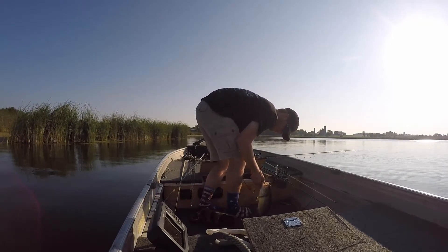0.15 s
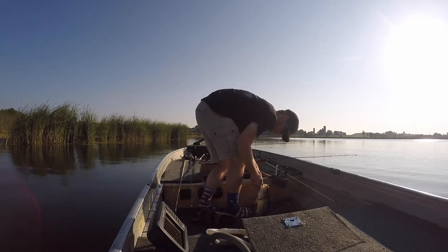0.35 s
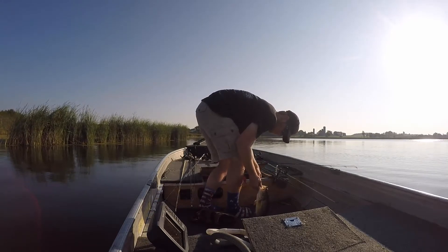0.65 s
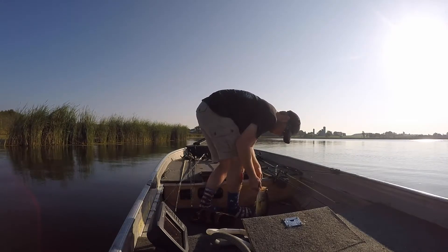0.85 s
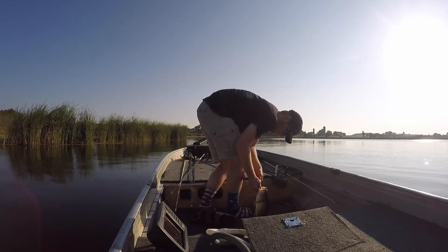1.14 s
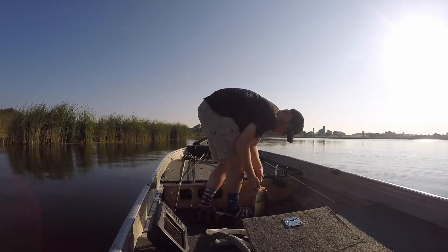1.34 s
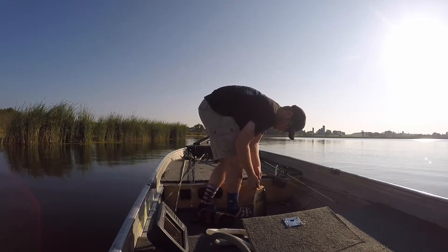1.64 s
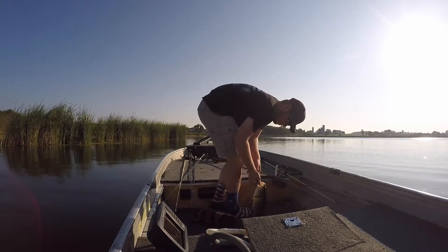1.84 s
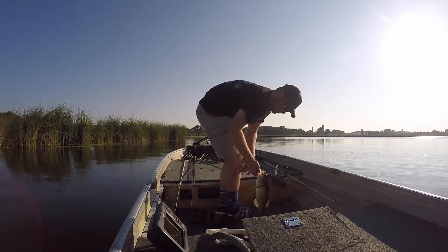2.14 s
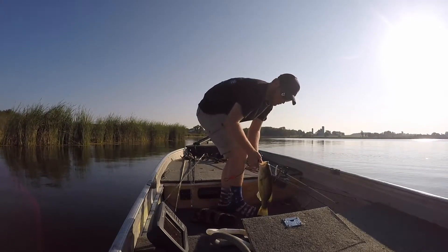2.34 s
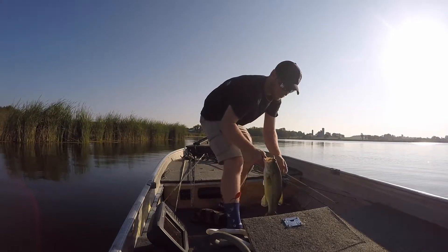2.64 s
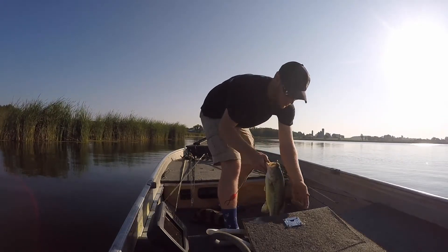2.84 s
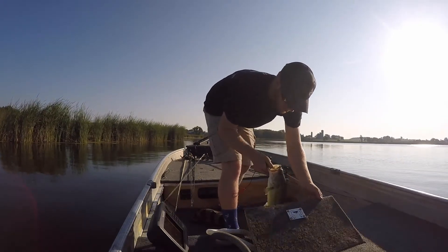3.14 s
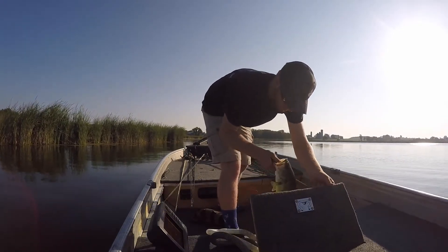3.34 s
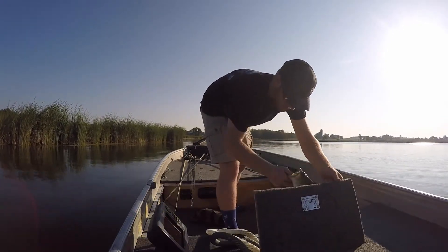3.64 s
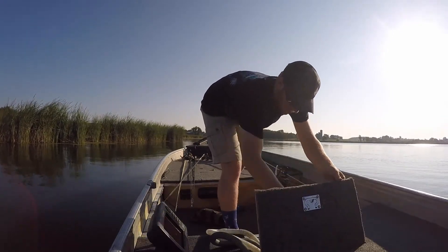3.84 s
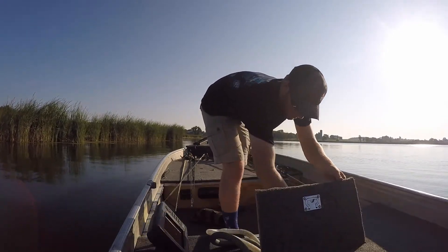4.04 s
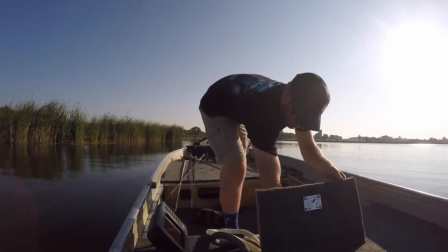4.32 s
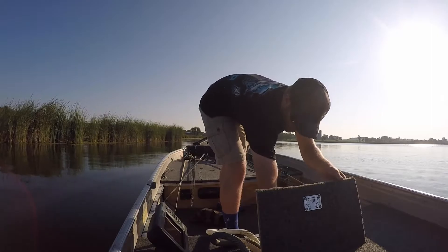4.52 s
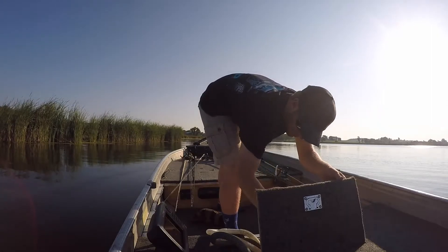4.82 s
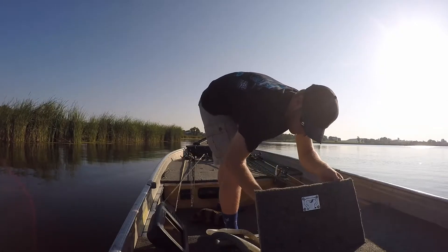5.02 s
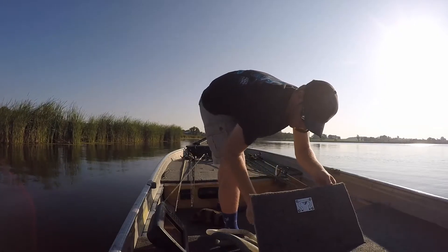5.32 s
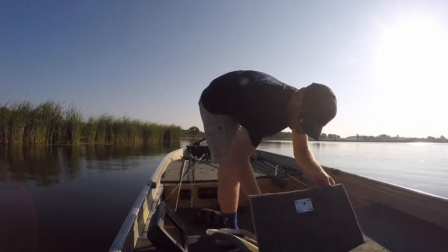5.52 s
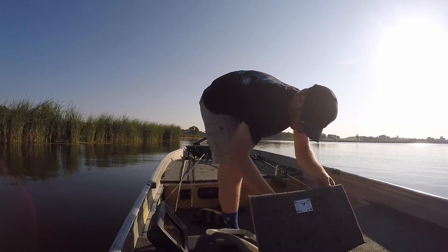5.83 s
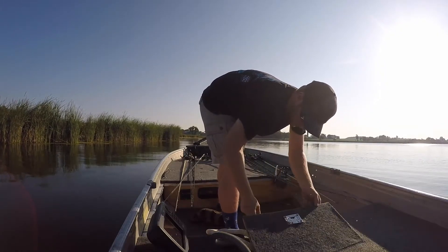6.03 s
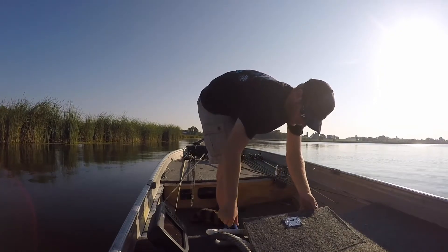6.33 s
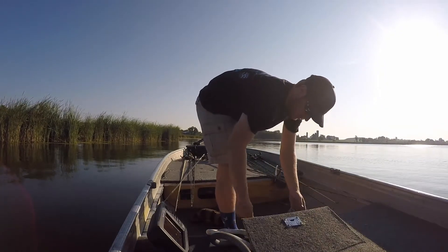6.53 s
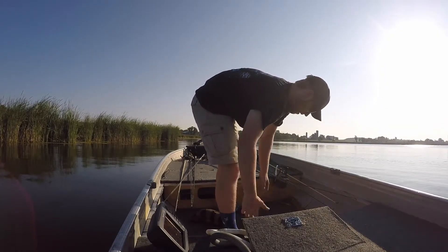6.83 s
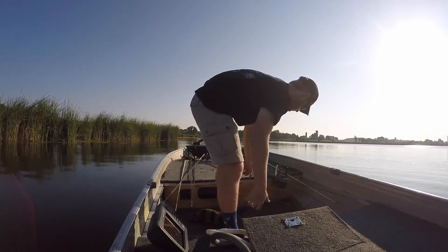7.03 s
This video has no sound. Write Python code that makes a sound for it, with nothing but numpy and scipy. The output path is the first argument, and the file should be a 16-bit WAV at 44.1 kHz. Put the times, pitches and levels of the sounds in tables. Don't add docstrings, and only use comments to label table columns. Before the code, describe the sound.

The microphone is fixed to a metal boat on calm water, so blows arrive through the hull, deep and close. Low rumble lurches unevenly with shifting feet, strongest in the first 1.7 s; faint hiss and distant traffic lie behind. A soft thud opens, then at 1.0 s tackle lands with a very loud, bright crack and a boom near 80 Hz, rattling until 1.4 s. Around 2 s it is quiet, with sparse ticks, drips and a faint insect chirp at 2.2. At 3.0 s the hatch gives duller knocks and scraping, with a thump at 3.3. From 3.9 to 5.5 s, hollow plops, drips and light rustle. A hollow plunk at 5.7 leads to two rising glugs, then scraping and a loud lid slam at 6.1 s. Bounces, scrapes, small clicks and thuds settle until just after 7 s.

```python
import sys
import numpy as np
from scipy import signal
from scipy.fft import rfft, irfft, next_fast_len
from scipy.io import wavfile
from scipy.ndimage import uniform_filter1d, map_coordinates

SR = 44100
rng = np.random.default_rng(int(sys.argv[2]) if len(sys.argv) > 2 else 0)


def unload_audio(sound):
    columns = np.transpose(np.atleast_2d(sound))
    steps = np.round(np.clip(columns, -1, 1) * 32767)
    wavfile.write(sys.argv[1], SR, steps.astype(np.int16))


def voltage_ratio(level):
    return 10 ** (np.asarray(level, float) / 20)


N = 316197

# [f/Hz, level/dB per Hz]
FAR_TRAFFIC_COLOUR = [(82, -33), (140, -2), (172, 0), (318, -8), (376, -3.5), (451, -12), (497, -9),
                      (632, -6), (688, -10.5), (876, -2.5), (964, -15), (1100, -13.5), (2500, -38.5),
                      (3250, -50), (5500, -120)]
HISS_COLOUR = [(1500, -22), (4000, 7), (8000, 0.5), (14700, -2.5), (15250, -5)]
ROCKING_COLOUR = [(7.1, -46.5), (12, -8.5), (32, -0.5), (49, -1.5), (62, -11), (120, -20.5), (160, -37.5),
                  (260, -120)]
HUM_COLOUR = [(40, -48), (62, -6), (80, 4.5), (100, -8), (125, -1.5), (170, -19), (260, -22)]
RUSTLE_COLOUR = [(710, -29.5), (1200, -2), (3000, -6), (3240, -5.5), (4000, -7), (5610, -12.5),
                 (12000, -25.5), (15250, -45)]
SCRAPE_COLOUR = [(130, -17), (220, 0), (600, -7), (1500, -12), (3500, -28.5), (7000, -40)]
CRACK_COLOUR = [(710, -25), (1200, -3), (1290, -20), (1430, -5.5), (1830, -6), (4260, -6.5), (4800, -9.5),
                (14700, -38.5), (16000, -42)]
BODY_COLOUR = [(150, -30), (300, 0), (800, 1.5), (1300, -5), (2200, -22)]
# [t/s, length/s, f/Hz, beats/Hz]
INSECT_CHIRP = (2.225, .065, 7950, 75)
# [t/s, level/dB]
SWAY = [(0.0, -33), (0.52, -42), (0.74, -40), (0.9, -33), (1.18, -33), (2.0, -53), (3.11, -38), (3.87, -43),
        (4.17, -52), (4.37, -52), (4.71, -42), (4.85, -46), (5.61, -42), (5.81, -45), (6.25, -37),
        (6.45, -40), (6.73, -38), (7.17, -44)]
# [middle t/s, peak level/dB, f/Hz, length/s]
LURCHES = [(0.146, -23.8, 47.7, 0.038), (0.21, -27.0, 40.1, 0.031), (0.352, -23.9, 42.9, 0.03),
           (0.451, -32.0, 49.1, 0.038), (0.512, -29.1, 39.7, 0.03), (0.678, -28.0, 36.7, 0.03),
           (0.753, -24.4, 46.5, 0.048), (0.851, -26.3, 42.4, 0.03), (0.93, -27.8, 31.6, 0.03),
           (1.128, -19.2, 37.4, 0.03), (1.213, -24.2, 46.6, 0.03), (1.332, -25.0, 45.6, 0.031),
           (1.479, -26.3, 37.7, 0.03), (1.56, -28.7, 46.0, 0.03), (1.677, -29.5, 42.4, 0.032),
           (1.902, -37.7, 26.4, 0.04), (2.351, -36.2, 28.7, 0.039), (2.499, -34.3, 38.2, 0.03),
           (2.592, -30.0, 42.1, 0.03), (2.659, -35.3, 36.6, 0.03), (2.967, -27.5, 31.5, 0.041),
           (3.035, -30.5, 54.7, 0.031), (3.11, -25.4, 38.1, 0.053), (3.308, -28.0, 36.5, 0.03),
           (3.377, -23.1, 45.5, 0.057), (3.45, -28.6, 43.5, 0.03), (3.639, -29.4, 31.4, 0.03),
           (3.736, -29.2, 30.7, 0.034), (3.908, -32.9, 32.4, 0.031), (3.994, -32.0, 29.4, 0.03),
           (4.55, -31.1, 23.9, 0.047), (4.681, -31.6, 34.6, 0.03), (4.827, -36.1, 30.6, 0.04),
           (4.907, -30.1, 31.5, 0.05), (5.079, -34.2, 28.8, 0.061), (5.164, -33.7, 31.2, 0.03),
           (5.396, -33.2, 29.9, 0.058), (5.503, -33.6, 35.9, 0.03), (5.601, -32.8, 30.6, 0.045),
           (5.734, -33.5, 32.3, 0.051), (5.827, -31.0, 26.5, 0.044), (5.994, -29.5, 42.9, 0.03),
           (6.299, -25.0, 52.6, 0.03), (6.381, -27.3, 40.4, 0.03), (6.598, -27.0, 45.0, 0.03),
           (6.659, -24.6, 36.9, 0.089), (6.788, -26.8, 51.5, 0.032), (6.882, -27.5, 48.3, 0.033)]
# [t/s, f/Hz, rms level/dB]
GLUGS = [
    [(5.715, 255, -60), (5.735, 242, -46), (5.755, 236, -40), (5.778, 262, -46), (5.795, 330, -52),
     (5.815, 385, -62)],
    [(5.84, 292, -62), (5.856, 302, -45), (5.885, 330, -46), (5.905, 350, -46), (5.925, 378, -54),
     (5.94, 410, -51), (5.955, 425, -62)],
]
# [t/s, peak level/dB, f/Hz]
DRIPS = [(1.277, -49.5, 5400), (1.795, -49.5, 2530), (1.885, -53, 5500), (1.91, -54, 4630),
         (1.96, -51, 3300), (1.955, -52, 1910), (2.39, -52, 5600), (3.084, -46, 3930), (3.097, -50, 4000),
         (3.205, -53, 3670), (3.459, -53, 4140), (3.46, -60, 7460), (3.575, -55, 5800),
         (3.956, -42.5, 2600), (4.251, -39, 4500), (4.496, -48, 2700), (4.975, -49, 2500),
         (5.009, -48.5, 3470), (5.03, -54.5, 8400), (5.067, -50, 4100), (5.232, -42, 3070),
         (5.236, -52, 5400), (5.386, -53, 2750), (5.478, -46.5, 3480), (5.509, -49.5, 4700),
         (5.701, -34.5, 2320), (5.783, -50, 2100), (6.866, -50, 3100), (6.879, -49, 3100),
         (6.88, -51, 4200), (6.924, -47, 2800), (7.0, -50, 3100), (7.098, -45, 2980), (7.157, -43, 4900)]
# [t/s, peak level/dB, f/Hz]
CLICKS = [(2.681, -50, 2400), (3.35, -53, 5500), (3.403, -50.5, 7500), (4.18, -44.5, 2980),
          (4.423, -46, 3020), (4.967, -53, 4200), (5.05, -59, 7500), (5.099, -49, 3030),
          (5.278, -49.5, 5570), (5.298, -52, 3000), (5.34, -54, 5030), (6.308, -48, 5300),
          (6.33, -44.5, 3400), (6.368, -44, 1700), (6.408, -43, 3200), (6.418, -41, 1600),
          (6.465, -50, 3900), (6.53, -43, 1100), (6.686, -43, 1600), (6.99, -44, 2000), (7.04, -47, 3400),
          (6.604, -37.5, 2750), (6.648, -42, 3200), (6.818, -36.5, 2600)]
# [t/s, peak level/dB, f/Hz, t60/s]
HOLLOW_NOTES = [(.66, -39, 540, 0.047), (3.25, -36.5, 638, 0.14), (3.254, -41, 1296, 0.088),
                (3.968, -27.5, 820, 0.052), (4.254, -29, 351.4, 0.13), (3.03, -35, 563, 0.081),
                (4.86, -36.5, 186, 0.097), (4.9, -44, 1560, 0.051), (4.99, -40, 377, 0.15),
                (5.411, -48.5, 974, 0.14), (5.702, -22, 337, 0.09), (4.993, -44, 600, 0.07),
                (5.79, -44.5, 760, 0.092), (5.845, -44, 760, 0.07), (5.95, -35, 524, 0.055),
                (6.768, -37, 1226, 0.1), (6.834, -53, 290, 0.11), (7.07, -34, 537, 0.093),
                (6.121, -18, 830, 0.05), (6.1215, -19, 1090, 0.06), (6.203, -26.5, 724, 0.064),
                (6.272, -29, 840, 0.079), (6.553, -37, 530, 0.06), (6.66, -35.5, 883, 0.067),
                (6.691, -42, 1630, 0.071), (5.14, -46, 540, 0.08), (5.232, -48, 1000, 0.08),
                (5.3, -45, 1010, 0.06), (5.982, -42, 1030, 0.07), (6.028, -37, 560, 0.06),
                (6.008, -34, 190, 0.1), (5.82, -42, 200, 0.09), (5.95, -43, 930, 0.06),
                (6.592, -39, 880, 0.08), (6.782, -45, 1380, 0.07), (6.06, -29, 152, 0.14),
                (6.83, -36, 520, 0.06), (4.014, -42, 1750, 0.05), (1.03, -20, 813, 0.12),
                (1.034, -20, 530, 0.11)]
# [t/s, hold/s, scrape level/dB, rustle level/dB]
MOVES = [(1.115, 0.062, -45, -58), (1.44, 0.056, -77, -72), (2.0, 0.35, -66.5, -68), (2.83, 0.34, -57, -75),
         (3.13, .3, -58, -75), (3.79, 0.17, -60.5, -62), (4.136, 0.092, -67, -62), (4.86, 0.081, -59, -61),
         (5.267, 0.035, -66, -68.5), (5.8, 0.13, -58, -60.5), (6.07, 0.22, -41, -57),
         (6.41, 0.24, -50, -60.5), (6.723, 0.08, -47, -57.5), (6.857, 0.26, -49.5, -59)]
TACKLE = [(0.598, -48, -7, -3), (0.9333, -45.5, -11, 3), (0.9926, -37.5, -21, 7, 5600),
          (1.0136, -11, -11, -1.5, 5400), (1.0221, -4.5, -10, -1.5, 3900), (1.0394, -19, -0.5, 0.5, 3300),
          (1.0574, -24, -6, 3, 5600), (1.0864, -25.5, -13, 4.5, 6100), (1.1044, -28.5, -19, -4.5),
          (1.123, -33, -17, 6), (1.1363, -25, -24, 1.5, 3700), (1.1797, -23.5, -13, -2, 3100),
          (1.3209, -45, -8, 8), (1.3508, -39.5, -11, 7), (1.3763, -38.5, -26, 7.5), (1.4277, -39.5, -23, 5),
          (1.737, -31.5, -7, 0.8), (1.7669, -47, -14, 10), (1.9944, -42.5, -16, -2.5)]
HANDS = [(2.4319, -46, -2, 3.5), (2.6269, -42.5, -2.5, -1), (2.7706, -40, 1.5, -1.5),
         (2.798, -29, -10, -4.5), (2.8614, -51, -7, 5), (2.8978, -42, -5, -7), (2.9577, -43, -14, 4),
         (2.9896, -38, -11, 3), (3.0091, -26, -6, 0.7, 3500), (3.0275, -22, -5, 3.5, 4800),
         (3.0536, -29.5, -5.5, 1, 4000), (3.1752, -45, -1, -5), (3.26, -42.5, 2, -4.5),
         (3.3034, -36.5, -4.5, -5.5), (3.8736, -42, -7, 3.5), (3.9584, -36, -11, -4), (4.0068, -37.5, 0, 6),
         (4.0168, -32.5, -10, -6), (4.2198, -44, 0, 5), (4.2492, -37.5, 2, 5.3), (4.7641, -32, -24, -3.2),
         (4.8604, -40.5, -7, -6), (4.8948, -38, -25, 4.5)]
LID = [(5.6855, -37.5, -3, -0.5), (5.7009, -30, -14, -3.5), (5.7294, -32, -31, 2.5),
       (5.8142, -39.5, -15, -7.5), (5.875, -33.5, -14, 3), (5.9853, -32, -9, -15), (6.0107, -35, -11, -1),
       (6.0731, -31, -14, 4, 7000), (6.093, -30, -6, 0, 3300), (6.111, -31, -4, 1, 4500),
       (6.0849, -27, -4, -1.5, 3600), (6.1015, -26, 6, -8, 1900), (6.1185, -18.5, -8, 5, 9000),
       (6.1205, -12, -4, -1.5, 2100), (6.1394, -34, 11.5, 5, 7000), (6.17, -33, 5, -6, 2300),
       (6.2015, -24, -4.5, 3, 5500), (6.2138, -30.5, -10, -1.5), (6.2494, -36, -3, -2),
       (6.2731, -29, -1.5, -4, 2800), (6.3684, -41, -10, -6), (6.396, -38, -12, -3, 2500),
       (6.5829, -39, 0, -7, 1500), (6.6777, -42, -11, -4, 2900), (6.716, -31, -1.5, 7),
       (6.7226, -22, -7, 0, 2700), (6.7345, -36, -7, -5), (6.9277, -38.5, -21, 1), (6.9915, -39, -11, 0.5),
       (7.0445, -41, -2, 3)]
# [t/s, peak level/dB, panel level/dB, damping factor, boom f/Hz]
BLOWS = [(0.002, -22.5, -35, .8, 79.5), (1.015, -20, -6, 0.9, 78.6), (1.026, -2.5, -8, 1.64, 82.7),
         (1.0765, -10.5, -13, 1.0, 83), (1.104, -23, -8, 0.66, 83.2), (1.18, -26, -4, 0.7, 78.9),
         (2.955, -28, -19, 1.2, 61.4), (3.004, -15.5, -18.5, 0.75, 79.8), (3.028, -22, -13, 0.97, 82),
         (3.338, -29.5, -20, 1.1, 53.3), (5.82, -34, -2, 3, 72.4), (6.013, -30, -7.5, 0.7, 72.5),
         (6.074, -23.5, -5.5, 0.86, 81), (6.103, -21, -6, 0.8, 83.4), (6.1252, -5, -13, 1.15, 75.7),
         (6.203, -25.5, -0.5, 0.87, 75.6), (6.273, -22.5, -8.5, 0.99, 77.4), (6.59, -27.5, -9.5, 1.1, 68.5),
         (6.647, -22, -18, 1.3, 52), (6.721, -31, 0.5, 0.9, 80), (6.769, -21.5, -24, 1.6, 67),
         (6.835, -23, -9.5, 1.2, 73), (7.134, -24, -22, 1.9, 45)]
# [f/Hz, level/dB, t60/s]
HULL_MODES = [(52, -11.5, 0.35), (102.4, -5, 0.22), (127.2, -14, 0.23), (150.2, -18.5, 0.6)]
# [f/Hz, level/dB, t60/s]
PANEL_MODES = [(178.4, -5.5, 0.43), (228, 0.5, 0.17), (269.6, -0.5, 0.18), (347, -1, 0.15),
               (542.3, -11, 0.15), (646, -12, 0.059), (820, -9, 0.052), (1060, -12, 0.031)]


def unit(x):
    return x / np.sqrt(np.mean(x ** 2) + 1e-20)


def curves(rows):
    s, *cols = np.transpose(rows)
    return [np.interp(np.arange(N) / SR, s, c) for c in cols]


def gain(points, hz):
    f, db = np.transpose(points)
    return voltage_ratio(np.interp(np.log(hz + 1), np.log(f + 1), db, left=-120, right=-120))


def noise(points, size, extra=lambda hz: 1):
    fast = next_fast_len(size)
    hz = np.fft.rfftfreq(fast, 1 / SR)
    spectrum = rfft(rng.standard_normal(fast)) * gain(points, hz) * extra(hz)
    return unit(irfft(spectrum, fast)[:size])


def patchy(points, patchy_db):
    z = signal.stft(noise(points, size=next_fast_len(N + 999)), nperseg=512)[2]
    field = uniform_filter1d(rng.standard_normal(z.shape), size=6, axis=0)
    field = uniform_filter1d(field, size=8, axis=1)
    return unit(signal.istft(z * voltage_ratio(patchy_db * unit(field)), nperseg=512)[1][:N])


def wobble(rate):
    knots = rng.standard_normal(int(N * rate / SR) + 4)
    return map_coordinates(knots, [np.arange(N) * rate / SR])


def jitter(t, step):
    knots = t[::step]
    return np.interp(t, knots, rng.standard_normal(len(knots)))


def dying(t, t60, attack):
    return np.exp(-np.log(1000) * t / t60) * (1 - np.exp(-t / attack))


def add(track, s, sound):
    part = track[round(s * SR):][:len(sound)]
    part += sound[:len(part)]


def hiss():
    return voltage_ratio(-73) * noise(HISS_COLOUR, size=N)


def far_traffic():
    return voltage_ratio(-54.5) * patchy(FAR_TRAFFIC_COLOUR, patchy_db=.6)


def insect():
    s, length, hz, beats = INSECT_CHIRP
    out, t = np.zeros(N), np.arange(int(length * SR)) / SR
    pulses = np.hanning(len(t)) * np.sin(np.pi * beats * t) ** 4
    tone = np.sin(2 * np.pi * hz * t + 5 * np.cos(2 * np.pi * beats * t))
    add(out, s, voltage_ratio(-61) * pulses * tone)
    return out


def rumble():
    rest_db, under_sway_db = -50.5, -14
    after_db, after_t60, after_rise_s = -18.5, .85, 0.032
    rocking_db, = curves(SWAY)
    lumps = voltage_ratio(2.2 * wobble(9.5)) * noise(ROCKING_COLOUR, size=N)
    rocking = voltage_ratio(rocking_db + 1.4) * unit(lumps)
    hum_power = voltage_ratio(2 * rest_db) + voltage_ratio(2 * (rocking_db + under_sway_db))
    t = np.arange(SR) / SR
    for s, db, *_ in BLOWS:
        add(hum_power, s, (voltage_ratio(db + after_db) * dying(t, after_t60, after_rise_s)) ** 2)
    hum = unit(voltage_ratio(3.9 * wobble(12)) * noise(HUM_COLOUR, size=N))
    return rocking + np.sqrt(hum_power) * hum


def lurches():
    out, t = np.zeros(N), np.arange(-SR // 8, SR // 8) / SR
    for s, db, hz, length in LURCHES:
        swell = np.exp(-.5 * (t / (.43 * length)) ** 2)
        add(out, s + t[0], voltage_ratio(db - 0.6) * np.cos(2 * np.pi * hz * t) * swell)
    return out


def glugs():
    out, t = np.zeros(N), np.arange(N) / SR
    for rows in GLUGS:
        hz, db = curves(rows)
        start, end = rows[0][0], rows[-1][0]
        during = np.abs(t - (start + end) / 2) < (end - start) / 2
        tone = np.sin(2 * np.pi * np.cumsum(hz) / SR)
        out += during * voltage_ratio(db + 3 + 1.8 * wobble(70)) * tone
    return out


def drips():
    out, t = np.zeros(N), np.arange(4096) / SR
    # t60/s, and width as a share of the pitch
    for rows, t60, width in (DRIPS, 0.046, 0.061), (CLICKS, 0.042, 0.27):
        for s, db, hz in rows:
            resonance = lambda f: 1 / (1 + ((f - hz) / (width * hz)) ** 2)
            splash = noise(CRACK_COLOUR, size=len(t), extra=resonance)
            add(out, s, voltage_ratio(db) * splash * dying(t, t60, 0.069 * t60))
    return out


def hollow_notes():
    out, t = np.zeros(N), np.arange(SR // 3) / SR
    for s, db, hz, t60 in HOLLOW_NOTES:
        waver = jitter(t, 300)
        tone = np.sin(2 * np.pi * hz * t * (1 + 0.11 * t) + 0.0007 * hz * waver)
        add(out, s, voltage_ratio(db + 1.6 * waver) * tone * dying(t, t60, 0.0027))
    return out


def moving_power():
    rise_db_per_s, fall_db_per_s = 68, 82
    s, hold, scrape_db, rustle_db = np.transpose(MOVES)[..., None]
    t = np.arange(N) / SR
    before, after = np.clip(s - t, 0, None), np.clip(t - s - hold, 0, None)
    off_db = -rise_db_per_s * before - fall_db_per_s * after
    return [np.sum(voltage_ratio(2 * (db + off_db)), axis=0) for db in (scrape_db, rustle_db)]


def rustle():
    drops, t = np.zeros(N), np.arange(SR // 25) / SR
    for when, pitch, size, life in rng.random((260, 4)):
        hz = 1300 * np.exp(1.5 * pitch)
        rising = np.sin(2 * np.pi * hz * t * (1 + 0.8 * t))
        level = voltage_ratio(-3.5 * np.log(size + .04))
        add(drops, when * N / SR, level * rising * dying(t, .02 + 0.048 * life, 0.0021))
    cloth = patchy(RUSTLE_COLOUR, patchy_db=2) * voltage_ratio(2.3 * wobble(45))
    _, power = moving_power()
    return np.sqrt(power + voltage_ratio(2 * -65)) * (cloth + voltage_ratio(-3.5) * drops)


def scraping():
    grains, t = np.zeros(N), np.arange(SR // 20) / SR
    for when, pitch, size, life in rng.random((900, 4)):
        hz = 280 * np.exp(2.5 * pitch)
        level = voltage_ratio(-3 * np.log(size + 0.1) - 9 * pitch)
        fade = dying(t, (8 + 30 * life) / hz + 0.02, 0.0019)
        add(grains, when * N / SR, level * np.sin(2 * np.pi * hz * t) * fade)
    scrape = patchy(SCRAPE_COLOUR, patchy_db=3.5) * voltage_ratio(3.5 * wobble(30))
    power, _ = moving_power()
    return np.sqrt(power) * unit(scrape + 0.64 * unit(grains))


def taps():
    out, t = np.zeros(N), np.arange(6144) / SR
    spots_hz = np.geomspace(900, 16000, num=22)
    # brightest f/Hz, t60/s
    objects = (TACKLE, 3500, 0.049), (HANDS, 2920, 0.045), (LID, 2100, .045)
    contacts = [(row, tone_hz, t60) for rows, tone_hz, t60 in objects for row in rows]
    for (s, db, body_db, sharp_db, *own_hz), tone_hz, t60 in contacts:
        hz = tone_hz * 2 ** (-0.23 * sharp_db + 0.27 * rng.standard_normal())
        hz = own_hz[0] if own_hz else hz
        ragged_db = 1.5 * rng.standard_normal(len(spots_hz))

        def bright(f):
            peak = 1 + 1.0 / np.hypot(1, (f - hz) / (0.088 * hz))
            return peak * voltage_ratio(sharp_db * np.log2((f + 1) / 3500) + np.interp(f, spots_hz, ragged_db))

        grit = voltage_ratio(1.53 * jitter(t, 100))
        crack = unit(grit * noise(CRACK_COLOUR, size=len(t), extra=bright))
        scatter = unit(signal.lfilter([1], [1, -0.55], crack))
        crack = crack * dying(t, t60, 0.019 * t60)
        crack += voltage_ratio(-14.5) * scatter * dying(t, 2.7 * t60, 0.005)
        body = noise(BODY_COLOUR, size=len(t)) * dying(t, 2.08 * t60, 0.0029)
        add(out, s, voltage_ratio(db - 7.5) * crack + voltage_ratio(db + body_db - 2.5) * body)
    return out


def ring(t, modes, damping, rise):
    total = np.zeros(len(t))
    for hz, level, t60 in modes:
        steps = rng.normal(0, 0.37, len(t[::400]))
        drift = np.interp(t, t[::400], np.cumsum(steps))
        phase = 2 * np.pi * hz * rng.normal(1, 0.022) * t + rng.normal(0, 0.46) + 0.0043 * hz * drift
        total += voltage_ratio(level + rng.normal(0, 2.8)) * np.sin(phase) * dying(t, t60 / damping, rise)
    return total


def blows():
    out, t = np.zeros(N), np.arange(2 * SR // 5) / SR
    for s, db, panel_db, damping, boom_hz in BLOWS:
        swell = 0.005 / damping ** 2
        boom = -np.sin(2 * np.pi * boom_hz * t) * dying(t, 0.33 / damping, swell)
        hull = voltage_ratio(0.73 * (panel_db + 9.0)) * ring(t, HULL_MODES, damping, 1.7 * swell)
        panels = ring(t, PANEL_MODES, damping, 0.0028)
        add(out, s, voltage_ratio(db - 2.5) * (boom - hull) + voltage_ratio(db + panel_db - 4.5) * panels)
    return out


def scene():
    distant = hiss() + far_traffic() + insect()
    boat = rumble() + lurches()
    well = glugs() + drips() + hollow_notes()
    deck = rustle() + scraping() + taps() + blows()
    return (distant + boat + well + deck)[None]


def roll_off(x):
    return signal.sosfilt(signal.butter(12, 15350, fs=SR, output="sos"), x)


def record(dry):
    rounded = dry / (1 + np.abs(dry) ** 4) ** (1 / 4)
    return roll_off(rounded)


dry = scene()
out = record(dry)
unload_audio(out)
```